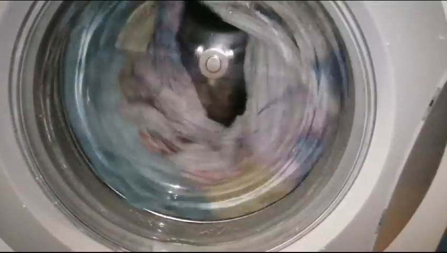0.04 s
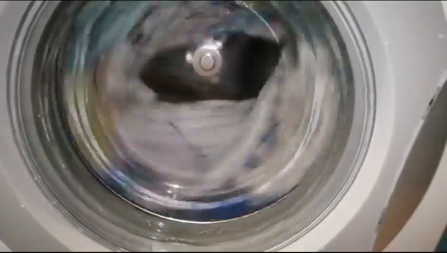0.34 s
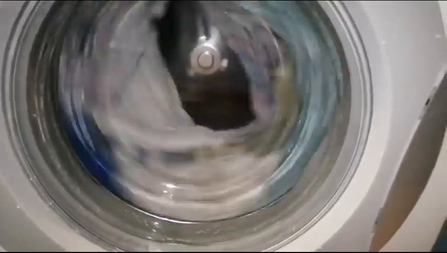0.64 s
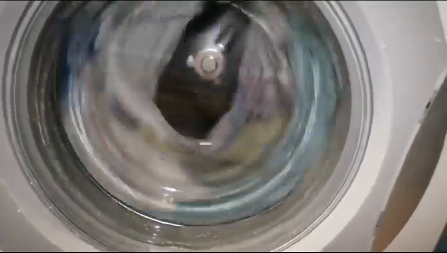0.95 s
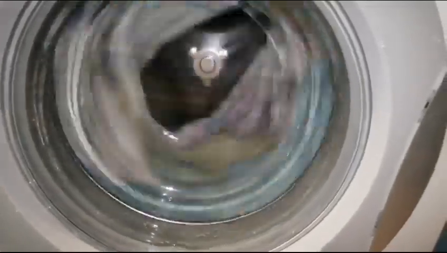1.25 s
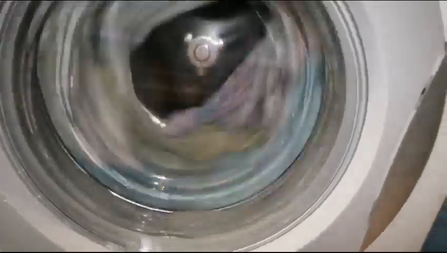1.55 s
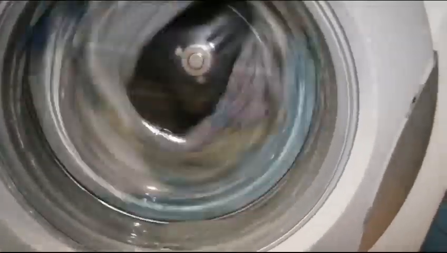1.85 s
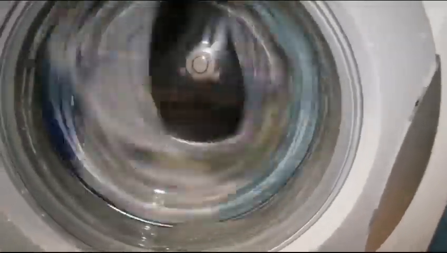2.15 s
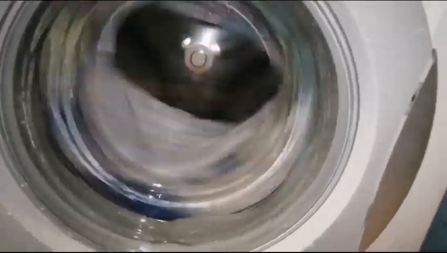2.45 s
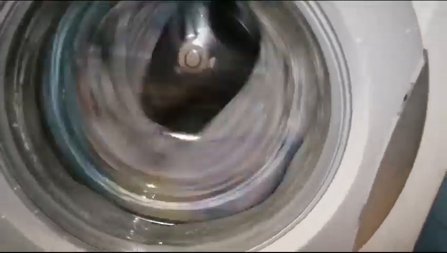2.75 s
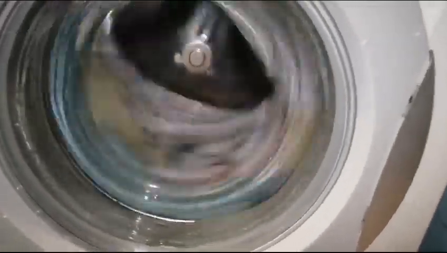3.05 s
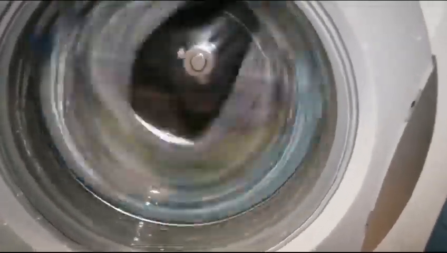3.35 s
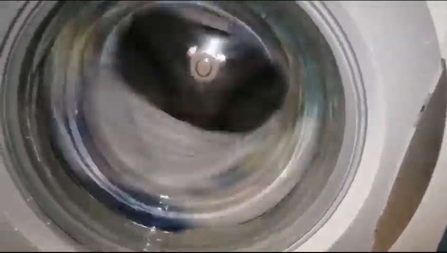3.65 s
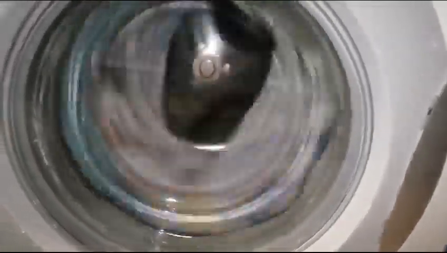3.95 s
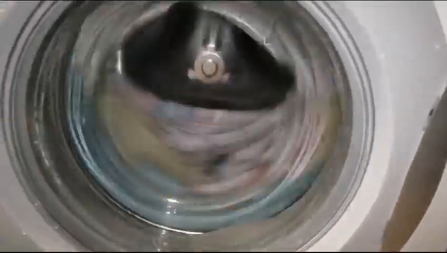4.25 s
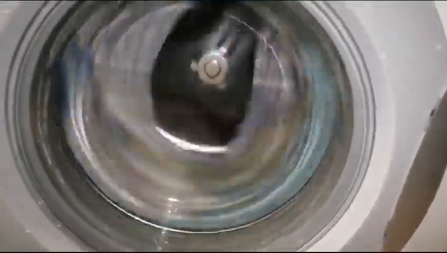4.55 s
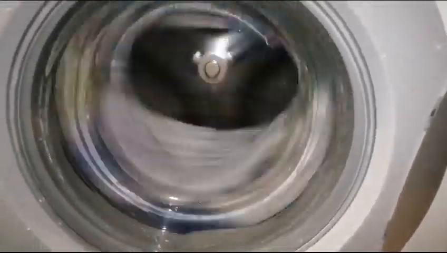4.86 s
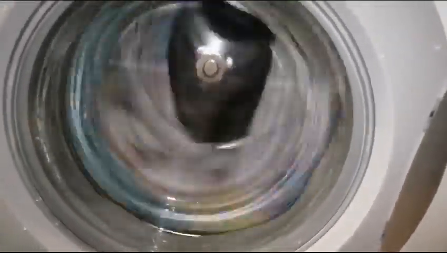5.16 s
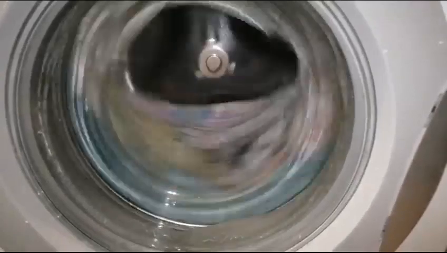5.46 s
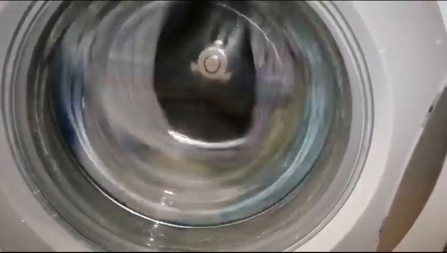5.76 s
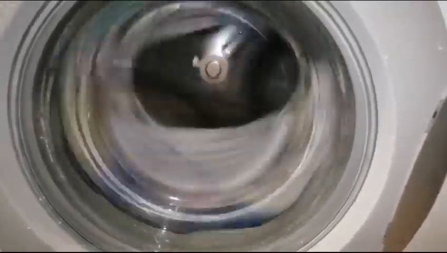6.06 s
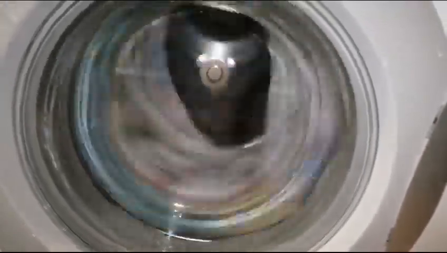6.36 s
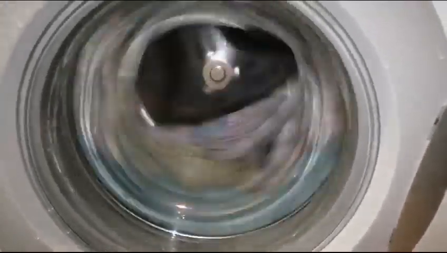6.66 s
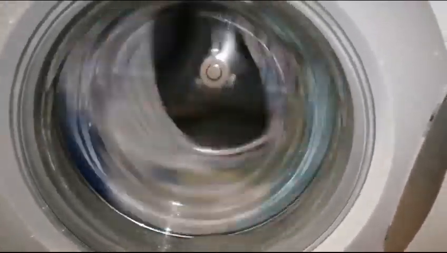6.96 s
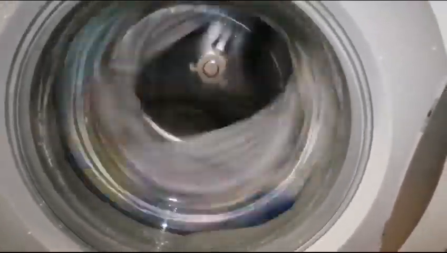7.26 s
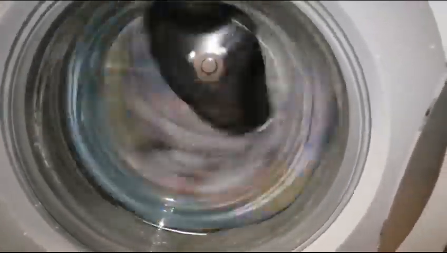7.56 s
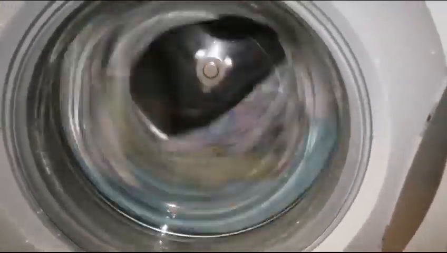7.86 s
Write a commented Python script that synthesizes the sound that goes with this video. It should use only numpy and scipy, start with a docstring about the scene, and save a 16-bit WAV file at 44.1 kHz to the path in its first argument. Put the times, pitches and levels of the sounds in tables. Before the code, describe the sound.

A washing machine speeds up its spin with a low rumble and short rising whines. The unbalanced tub bangs the metal cabinet six times in quick succession, and loose parts rattle. Then it settles into a much quieter, steady rumble and motor hum, with laundry brushing the rubber door seal on every turn. The machine is heard nearby in a small room, somewhat to the right.

```python
"""First comes a low rumble and a rising whine: a washing machine speeds up its spin in a small room.
The laundry sits to one side, so the swinging tub bangs the cabinet six times and loose parts rattle.
Then the tub centres itself and rumbles on, while the laundry brushes the rubber door seal on every turn.
A hum, the motor's tones and a thin whistle from its electronics waver as it lifts the heavy side."""
import sys
import numpy as np
from scipy import signal
from scipy.fft import rfft, irfft, next_fast_len
from scipy.io import wavfile
from scipy.ndimage import uniform_filter1d, minimum_filter1d

SR = 44100
rng = np.random.default_rng(int(sys.argv[2]) if len(sys.argv) > 2 else 0)


def transcribe(signal):
    """Save signal, clipped to [-1, 1], as a 16-bit WAV file at the path in sys.argv[1]."""
    frames = np.atleast_2d(signal).T
    limited = np.clip(frames, -1, 1)
    pcm = np.round(limited * 32767).astype(np.int16)
    wavfile.write(sys.argv[1], SR, pcm)


N = 358533
TIME = np.arange(N) / SR
FULL_TURNS_PER_S, SETTLED_S = 4.193, 3.1135   # top drum speed; when the steady brushing begins

# extra churning of the laundry while the tub swings wide: time_s, extra_db
TUB_SWING = [(1.45, -1), (1.8, 12.5), (2.1, 16), (2.8, 16), (3.15, 5.5)]
# short-lived notes of the door glass and seal: pitch_hz, level_db, fade_s
DOOR_NOTES = [(840, -13, 0.071), (923, 0, 0.036), (1160, -12, 0.017), (1216, -8, 0.058)]


def from_db(db):
    """Turn decibels into a number to multiply by."""
    return 10 ** (np.asarray(db) / 20)


def unit_level(x):
    """Scale a signal so that its average level (rms) is 1."""
    return x / np.sqrt(np.mean(x ** 2) + 1e-20)


def over_time(points):
    """Join (time_s, value) points into a curve with one value per sample."""
    return np.interp(TIME, *np.transpose(points))


def at_pitch(points, hz):
    """Read between (pitch_hz, value) points, giving every octave the same width."""
    pitch_hz, value = np.transpose(points)
    return np.interp(np.log(hz + 1e-3), np.log(pitch_hz), value)


def held(start_s, values):
    """Hold each event's value until the next event."""
    return values[np.maximum(np.searchsorted(start_s, TIME, "right") - 1, 0)]


def pan(left_db):
    """Gains for the two ears, with the left louder by left_db."""
    return from_db(np.array([[.5], [-.5]]) * left_db)


def drift(rate_hz):
    """A smooth random wander with a typical size of 1."""
    keep = np.exp(-80 * np.pi * rate_hz / SR)
    steps = rng.standard_normal(N // 40 + 2002)   # one step per 40 samples
    slow = signal.lfilter([1], [1, -2 * keep, keep * keep], steps)[2000:]
    return np.interp(np.arange(N) / 40, np.arange(len(slow)), unit_level(slow))


def tone(hz):
    """A pure tone at level 1 that follows a pitch."""
    return np.sqrt(2) * np.sin(2 * np.pi * (np.cumsum(hz + np.zeros(N)) / SR + rng.random()))


def noise(colour, peaky_db=0):
    """Stereo noise at level 1, shaped by (pitch_hz, level_db) points; peaky_db adds narrow peaks."""
    # how alike the ears are, from 1 (same) to 0 (unrelated): pitch_hz, likeness
    ear_likeness = [(60, 1), (130, 1), (290, 0.85), (640, 0.44), (1410, 0.051), (3000, 0)]
    size = next_fast_len(N)
    hz = np.arange(size // 2 + 1) * SR / size
    alike = np.clip(at_pitch(ear_likeness, hz), -1, 1)
    mid, side = rfft(rng.standard_normal((2, size)))
    ears = np.sqrt(1 + alike) * mid + np.sqrt(1 - alike) * side * [[1], [-1]]
    ripple_hz = np.arange(0, SR / 2, 35)
    ripple = np.interp(hz, ripple_hz, rng.uniform(-1, 1, len(ripple_hz)))
    edge_fade = np.minimum(1, np.minimum(hz / colour[0][0], colour[-1][0] / (hz + 1))) ** 3
    shaped = ears * edge_fade * from_db(at_pitch(colour, hz) + peaky_db * ripple)
    return unit_level(irfft(shaped, size)[:, :N])


def clicks_at(start_s, gains):
    """One click for each blow."""
    out = np.zeros(N)
    np.add.at(out, np.clip(np.round(start_s * SR).astype(int), 0, N - 1), gains)
    return out


def ring(clicks, hz, fade_s):
    """Each click starts a note that dies away by 60 dB in fade_s."""
    keep, step = from_db(-60 / (fade_s * SR)), 2 * np.pi * hz / SR
    return signal.lfilter([0, np.sin(step)], [1, -2 * keep * np.cos(step), keep * keep], clicks + 1e-18)


def strike(notes, start_s, levels_db, vary_db, spread_s):
    """Each blow wakes all of an object's natural notes, each with its own strength and delay."""
    out = np.zeros((2, N))
    for hz, db, fade_s in notes:
        gains = from_db(levels_db + db + vary_db * rng.standard_normal(len(start_s)))
        wake_s = start_s + spread_s * rng.random(len(start_s))
        for ear in out:
            travel_s = rng.uniform(0, 0.00054, len(start_s))
            ear += ring(clicks_at(wake_s + travel_s, gains), hz, fade_s)
    band_hz = [notes[0][0] * .5, notes[-1][0] * 1.35]   # the object sounds only around its notes
    return signal.sosfilt(signal.butter(2, band_hz, "band", fs=SR, output="sos"), out)


def bursts(start_s, levels_db, rise_s, fade_s):
    """Loudness curve of blows that swell and die away."""
    power = np.zeros(N)
    age_s = TIME[:SR]
    shape = (1 - np.exp(-age_s / rise_s)) * from_db(-60 * age_s / fade_s)
    for s, db in zip(start_s, levels_db):
        start = int(s * SR)
        power[start:start + SR] += (from_db(db) * shape[:N - start]) ** 2
    return np.sqrt(power)


def strokes(start_s, levels_db, lengths_s):
    """Loudness curve of rubs that press hard at first, then ease off."""
    out = np.zeros(N)
    for s, db, length_s in zip(start_s, levels_db, lengths_s):
        start, size = int(s * SR), int(length_s * SR)
        press = np.sqrt(np.hanning(size)) * np.linspace(1.4, .4, size)
        out[start:start + size] += from_db(db) * press[:N - start]
    return out


def lifting(turns):
    """The motor's effort: 1 as it lifts the heavy side of the laundry, -1 as that side falls."""
    return np.cos(2 * np.pi * (turns - .3))


def rumble(turns_per_s, turns):
    """The tub shakes the cabinet in step with the drum; tumbling laundry adds an uneven boom and drone."""
    # how hard the cabinet shakes: time_s, level_db
    shaking = [(0, -62), (1.23, -58), (1.33, -35.5), (1.58, -35.5), (1.78, -30.5), (2.8, -27.5),
               (3.25, -33.5), (4.2, -32), (8.13, -34)]
    # vibrations in step with the drum: shakes_per_turn, level_db
    drum_shakes = [(15, -5), (17, -5.5), (18, -22.5), (19, -24), (26, -14.5), (29, -6)]
    # the cabinet's deep boom: pitch_hz, level_db
    boom_colour = [(15, -29), (35, -16), (50, -5.5), (63, 0.5), (74, 4), (83, 5.5), (92, -9), (104, 1),
                   (115, -6), (122, -2.5), (132, -7), (150, -26), (220, -95)]
    # the panels' higher drone: pitch_hz, level_db
    drone_colour = [(110, -10), (140, 0.5), (153, 1), (168, -9), (180, 4), (193, 4), (215, 2.5),
                    (231, -13.5), (256, -2), (290, -10), (350, -11.5), (385, -20.5), (480, -25.5),
                    (700, -74)]
    shake_db = over_time(shaking)
    boom_db = shake_db + .25 * lifting(turns) + 1.64 * drift(2.5)
    drone_db = -46.5 + .39 * (shake_db - shake_db.mean()) + .61 * over_time(TUB_SWING)
    angle = 2 * np.pi * (turns - .49)   # the heavy side jolts the tub about halfway through a turn
    throb = sum(from_db(db + 1.1 * drift(2.3)) * np.sqrt(2) * np.cos(round(per_turn) * angle)
                for per_turn, db in drum_shakes)
    in_tune = (turns_per_s / FULL_TURNS_PER_S) ** 6   # the cabinet rings along only near full speed
    boom = in_tune * throb + from_db(4 - 6.64 * in_tune) * noise(boom_colour)
    return from_db(boom_db) * boom + from_db(drone_db) * noise(drone_colour)


def hum(turns):
    """Magnetic hum at two and four times the mains frequency; the upper note swells with each lift."""
    # loudness of the upper note: time_s, level_db
    hum_levels = [(0, -55), (1.2, -54), (2, -51), (4.7, -43.5), (6.4, -32), (6.8, -40), (8.13, -39)]
    swell_db = 2 * lifting(turns) + 3.6 * drift(8.4)
    upper = from_db(over_time(hum_levels) - 4 + swell_db) * tone(199.6 + .679 * drift(3.25))
    lower = from_db(-56.5) * tone(100 + 2.85 * drift(6.4))
    return upper + lower


def motor(turns_per_s, turns):
    """Churning, hiss and motor tones grow with speed; the tones sag as each lift slows the motor."""
    # the churning laundry: pitch_hz, level_db
    churn_colour = [(250, 2), (420, -2.5), (520, -3.5), (590, -4), (740, 0), (950, -4), (1100, -10.5),
                    (1270, -8.5), (1500, -24.5), (2200, -25.5), (5000, -64.5)]
    # the hiss of spinning: pitch_hz, level_db
    hiss_colour = [(760, -9.5), (1300, -6), (1600, -7), (2180, -6.5), (2290, -3), (2580, -8), (2880, -9),
                   (3480, -12), (3770, -19), (4160, -20.5), (5230, -10), (6010, -8.5), (7710, -23),
                   (12300, -34), (15000, -31.5), (15500, -47)]
    # the motor's tones at full speed: pitch_hz, level_db
    motor_notes = [(935, -67.5), (2301, -68.5), (2343, -72), (2512, -69.5), (2554, -70), (2712, -72),
                   (2754, -80.5)]
    speed_share = turns_per_s / FULL_TURNS_PER_S
    speed_db = 20 * np.log10(speed_share)
    churn_db = -57 + .28 * speed_db + over_time(TUB_SWING)
    hiss_db = -56.5 + 1.24 * speed_db + .5 * np.cos(2 * np.pi * turns)
    out = from_db(churn_db + 2.7 * drift(30)) * noise(churn_colour, peaky_db=6.5)
    out += from_db(hiss_db + 1.2 * drift(25)) * noise(hiss_colour, peaky_db=4.5)
    slowing = 1 - .0095 * lifting(turns)
    for hz, db in motor_notes:
        ears = [tone(hz * slowing + 2.5 * drift(12)) * from_db(2 * drift(5)) for ear in range(2)]
        out += speed_share ** 2 * from_db(db) * np.array(ears)
    return out


def whistle(turns_per_s, turns):
    """Electronics switch the motor's power very fast; their whistle sinks as the drum speeds up."""
    # loudness of the whistle: time_s, level_db
    whistle_levels = [(0, -77), (1.2, -68.5), (2.6, -71), (3.2, -65.5), (5.8, -69.5), (7.5, -66),
                      (8.13, -77)]
    switching_hz = 15950
    lift = lifting(turns)
    pitch_hz = switching_hz - 246 * turns_per_s + 20 * (lift - 1) + 16 * drift(300)
    out = np.zeros((2, N))
    for ear in out:
        ear += from_db(3.5 * lift - 1 + 1.5 * drift(20)) * tone(pitch_hz)
        ear += from_db(-5 + 2 * drift(30)) * tone(pitch_hz + 76)   # a close tone makes it flutter
    return from_db(over_time(whistle_levels)) * out


def whines():
    """The motor sings in short, rising, slightly rough tones as it picks up speed."""
    # each whine: start_s, length_s, start_pitch_hz, level_db, overtones_relative_db
    glides = [(.13, 0.16, 605, -62, -4), (.36, 0.34, 652, -54, 0.5), (.69, 0.31, 714, -51.5, 0.5),
              (.78, 0.16, 914, -54, -30), (1.0, 0.185, 768, -57, -20), (1.04, 0.42, 910, -52.5, -28),
              (1.34, 0.29, 902, -50.5, -33)]
    # faint higher tones that come and go with the whines: pitch_hz, relative_db
    higher_notes = [(1035, -11.5), (1245, -11.5)]
    rise_hz_per_s, fade_s = 165, .048
    out = np.zeros(N)
    overtones = sum(from_db(db) * tone(hz + 16 * drift(39)) for hz, db in higher_notes)
    wobble_hz = 14 * drift(72)
    for start_s, length_s, hz, db, overtones_db in glides:
        age_s = TIME - start_s
        fade = np.clip(np.minimum(age_s, length_s - age_s) / fade_s, 0, 1)
        glide = tone(hz + rise_hz_per_s * age_s + wobble_hz)
        out += fade * from_db(db) * (glide + from_db(overtones_db) * overtones)
    return out * from_db(-3 + 2 * drift(40))


def scuffs():
    """Laundry brushes the door seal: a tap, a squeaky rub and a double knock in the side panels."""
    # one-off scuffs: start_s, tap_db, rub_db, knock_db, squeak_db, squeak_hz, length_s
    single_scuffs = [(0.414, -68, -68, -49.5, -72, 966, 0.024), (1.556, -63, -65, -43, -77, 950, 0.03),
                     (1.861, -31, -40, -34.5, -38.5, 895, 0.033), (1.891, -36, -46, -34, -36, 890, 0.028),
                     (2.144, -38, -43, -36, -37, 950, 0.032), (2.424, -34, -45, -34, -35.5, 950, 0.028),
                     (2.742, -29, -39, -24, -38, 903, 0.027), (3.385, -53, -61, -46.5, -62, 1000, 0.054),
                     (5.978, -40, -54, -45, -47, 1086, 0.047), (7.101, -54, -54, -64, -48, 1210, 0.024),
                     (7.512, -43.5, -60, -44, -58, 990, .03)]
    # notes of the side panels: pitch_hz, level_db, fade_s
    panel_notes = [(236.2, -4.5, 0.34), (255.2, 3, 0.36), (274, -5, 0.11), (315, -6.5, 0.092),
                   (341, -3.5, 0.2)]
    rows = sorted([tuple(row) for row in single_scuffs] + steady_brushes())
    start_s, tap_db, rub_db, knock_db, squeak_db, squeak_hz, length_s = np.transpose(rows)
    tap = strike(DOOR_NOTES, start_s, tap_db + 1.5, vary_db=1, spread_s=.0005)
    rubber = noise([(450, -21.5), (750, -2.5), (950, 1.5), (1270, -1), (1450, -8.5), (3000, -33.5)])
    # rubber sticks and slips, so its pitch is unsteady
    squeak = tone(held(start_s, squeak_hz) + 35 * drift(12) + 40 * drift(150))
    rub = strokes(start_s, rub_db, length_s) * rubber + strokes(start_s, squeak_db, length_s) * squeak
    rub *= unit_level(from_db(3 * drift(60)))
    knock = strike(panel_notes, start_s, knock_db - 5, vary_db=1, spread_s=.00408)
    knock += strike(panel_notes, start_s + .036, knock_db - 10, vary_db=2, spread_s=.00605)
    shudder = noise([(180, 2.5), (240, 11.5), (350, 8), (420, -3), (520, -4.5), (700, -33)])
    return tap + rub + knock + shudder * strokes(start_s, knock_db - 4.5, length_s + .012)


def bangs():
    """The tub hits the cabinet: a hard crack, ringing sheet metal, clatter in the room and a deep thud."""
    # each hit: start_s, crack_db, thud_db, clank_db, tail_relative_to_crack_db, left_minus_right_db
    hits = [(1.2962, -24, -17, -24, -8, -0.5), (1.6306, -24.5, -15, -23, -10, -2),
            (1.928, -23.5, -14, -23.5, -6, 1.5), (2.2148, -24.5, -15, -24, -4.5, 2.5),
            (2.4958, -23, -18, -24, -6.5, 1), (2.7639, -25.5, -20, -23, -7.5, -4.5)]
    # the crack of steel: pitch_hz, level_db
    crack_colour = [(590, 0), (1000, -8), (1290, -8.5), (1480, -5.5), (1710, -6.5), (2080, -14),
                    (2500, -12.5), (2970, -4.5), (3740, -21), (5150, -7), (6050, -10), (7790, -27),
                    (8740, -20), (11500, -66), (15500, -37)]
    # notes of the struck cabinet: pitch_hz, level_db, fade_s
    cabinet_notes = [(174, -8.5, 0.26), (236.5, -2.5, 0.29), (286.4, -3.5, 0.22), (332.5, -10, 0.54),
                     (565, -19.5, 0.74), (544, -9.5, 0.15), (692, -5, 0.24), (722, -7.5, 0.24),
                     (764, 4.5, 0.057), (814, 0.5, 0.15), (937, -9, 0.27), (1200, 3.5, 0.081),
                     (1293, -1.5, 0.052), (1570, -18, 0.33), (2740, -20, 0.1), (2960, -22, .08),
                     (2970, -13, 0.11), (5160, -15, 0.17), (5220, -10.5, 0.15), (5370, -30, .08),
                     (5740, -22, 0.22)]
    # the clatter that fills the room: pitch_hz, level_db
    clatter_colour = [(150, 10.5), (300, 5.5), (450, -4.5), (580, 1), (640, -2), (760, -11), (950, -1),
                      (1070, -15), (1240, -5), (1400, -13.5), (2000, -18.5), (4000, -45)]
    start_s, crack_db, thud_db, clank_db, tail_db, left_db = np.transpose(hits)
    steel = noise(crack_colour, peaky_db=6)
    crack = steel * bursts(start_s, crack_db - 2, rise_s=.0003, fade_s=.085)
    crack += steel * bursts(start_s, crack_db + tail_db, rise_s=.027, fade_s=.38)
    # thin panels keep buzzing against each other for a moment
    buzz = noise([(3000, -30), (7000, -3), (9000, 0), (12000, -6), (15500, -7)], peaky_db=6)
    buzz *= bursts(start_s, crack_db + tail_db - 16.5, rise_s=.005, fade_s=.38)
    buzz *= from_db(3.5 * drift(45))
    clank = strike(cabinet_notes, start_s, clank_db - 3, vary_db=1.2, spread_s=.0012)
    contact = bursts(start_s, clank_db + 1, rise_s=.0003, fade_s=.035)
    room_tail = bursts(start_s, clank_db - 3, rise_s=.015, fade_s=.54)
    clatter = noise(clatter_colour) * (contact + room_tail)
    # the front panel sets the room's air swinging, so the thud takes a moment to build
    panel = ring(clicks_at(start_s + .0057, from_db(thud_db)), hz=128, fade_s=.13)
    air = ring(panel, hz=106.8, fade_s=.42)
    thud = np.diff(air, prepend=0)   # a panel gives off little sound below its own note
    thud = thud / np.abs(thud).max() * from_db(thud_db.max() - 1)
    return (crack + buzz + clank + clatter + thud) * pan(held(start_s, left_db))


def rattles():
    """After a bang, loose parts snap against each other and ring briefly."""
    # each rattle: start_s, level_db, pitch_hz, left_minus_right_db
    loose_parts = [(1.362, -40, 6400, 9), (2.0, -51, 5640, 7), (2.24, -47, 8200, 20), (2.351, -46, 7500, 9),
                   (2.68, -48, 5240, 0), (2.936, -43, 5280, -3)]
    out = np.zeros((2, N))
    chatter = noise([(1000, 4), (3000, -3.5), (5000, -2.5), (9000, -19.5), (15000, -22)], peaky_db=13)
    chatter *= from_db(1.7 * drift(105))
    for start_s, db, hz, left_db in loose_parts:
        band = signal.butter(1, [hz * .955, hz * 1.045], "band", fs=SR, output="sos")
        ringing = unit_level(signal.sosfilt(band, chatter))
        ringing *= bursts([start_s], [db], rise_s=.001, fade_s=.19)
        snap = chatter * bursts([start_s], [db + 1], rise_s=.0005, fade_s=.07)
        out += (ringing + snap) * pan(left_db)
    return out


def steady_brushes():
    """List more scuffs: at full speed, each bulge of laundry meets the seal once a turn."""
    # each bulge: share_of_turn, tap_db, rub_db, knock_db, squeak_db
    bulges = [(0, -39.5, -47, -34, -53.5), (.45, -52, -60, -45.5, -68), (.76, -46.5, -55.5, -48.5, -66)]
    vary_db = [1, 2.5, 1.63, 4.5]   # tap, rub, knock, squeak
    squeak_hz, length_s = 1030, .067
    easing_db_per_s = 1   # the brushing softens as the laundry packs down
    rows = []
    for turn in range(int((TIME[-1] - SETTLED_S) * FULL_TURNS_PER_S)):
        for share, *levels_db in bulges:
            start_s = SETTLED_S + (turn + share) / FULL_TURNS_PER_S
            eased_db = np.array(levels_db) - easing_db_per_s * (start_s - SETTLED_S)
            chance_db = rng.standard_normal(len(levels_db)) * vary_db
            rows.append((start_s, *(eased_db + chance_db), squeak_hz, length_s))
    return rows


def flicks():
    """Once the spin is fast, loose ends of laundry flick the door at random."""
    when, strength = rng.random((30, 2)).T
    return strike(DOOR_NOTES, 3 + 5 * when, -51 + 7 * strength, vary_db=2.5, spread_s=.0005)


def place_right(sound):
    """Put the machine to the listener's right, by an amount that changes with pitch and time."""
    # balance between the ears: pitch_hz, left_minus_right_db
    balance = [(60, -6.5), (200, -8.5), (400, -8.5), (730, -1.5), (1200, -10), (2400, -7), (4400, -15),
               (8000, -3), (15000, -8)]
    # slow shift of that balance: time_s, left_minus_right_db
    balance_shift = [(0, 1.7), (2.7, 3), (3.5, 0), (6.5, -0.2), (8.13, -2.5)]
    size = next_fast_len(N + SR // 10)
    hz = np.arange(size // 2 + 1) * SR / size
    gains = pan(at_pitch(balance, hz))
    placed = irfft(rfft(sound, size) * gains / gains.mean(axis=0), size)[:, :N]
    return placed * pan(over_time(balance_shift))


def scene():
    """Count the drum's turns, then add the running sounds and the knocks together."""
    # the drum speeding up: time_s, turns_per_s
    drum_speed = [(0, 1.93), (.7, 2.62), (1.4, 3.12), (2.1, 3.63), (2.7, 3.95), (3.1, 4.193)]
    turns_per_s = over_time(drum_speed)
    turns = np.cumsum(turns_per_s) / SR
    turns -= np.interp(SETTLED_S, TIME, turns)   # whole numbers when the biggest bulge meets the seal
    running = rumble(turns_per_s, turns) + hum(turns) + whines()
    running = running + motor(turns_per_s, turns) + whistle(turns_per_s, turns)
    return place_right(running + bangs() + rattles() + scuffs() + flicks())


def record(dry):
    """Turn the loudest blows down for an instant (a limiter), then cut off the highest treble."""
    ceiling, window_samples, cutoff_hz = .34, 131, 15800
    safe_gain = np.minimum(1, ceiling / (np.abs(dry).max(axis=0) + 1e-9))
    gain = uniform_filter1d(minimum_filter1d(safe_gain, window_samples), window_samples)
    return signal.sosfilt(signal.ellip(10, .1, 80, cutoff_hz, fs=SR, output="sos"), dry * gain)


dry = scene()
out = record(dry)
transcribe(out)
```